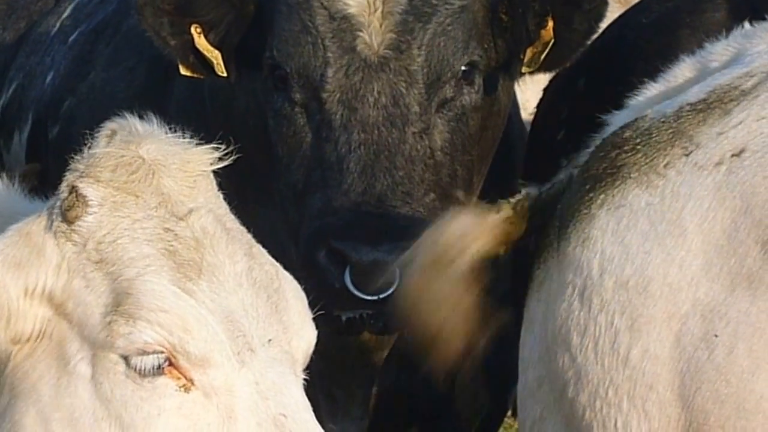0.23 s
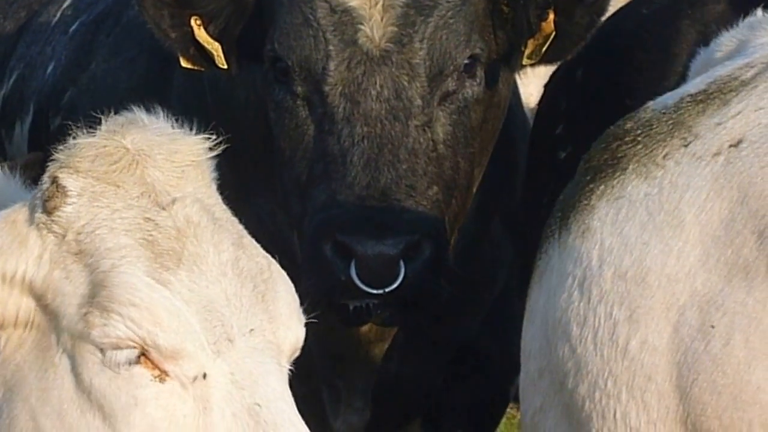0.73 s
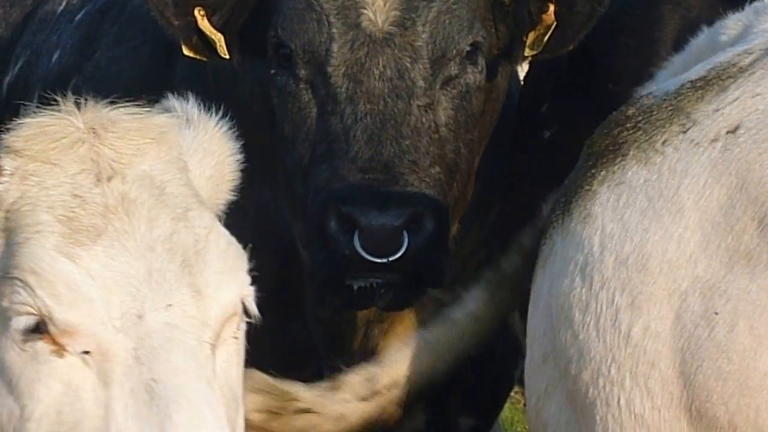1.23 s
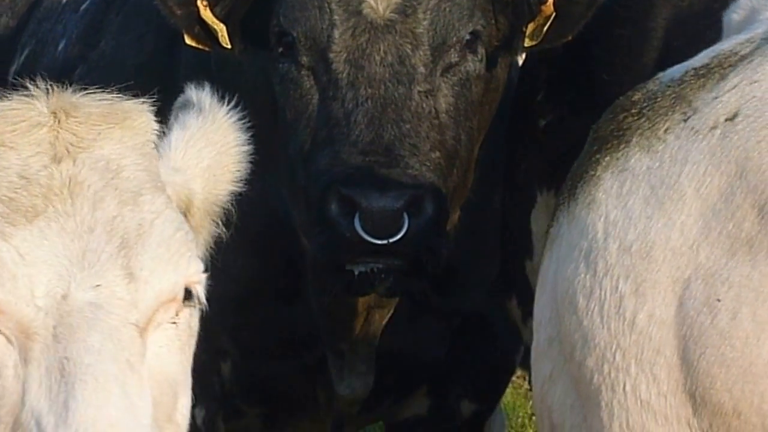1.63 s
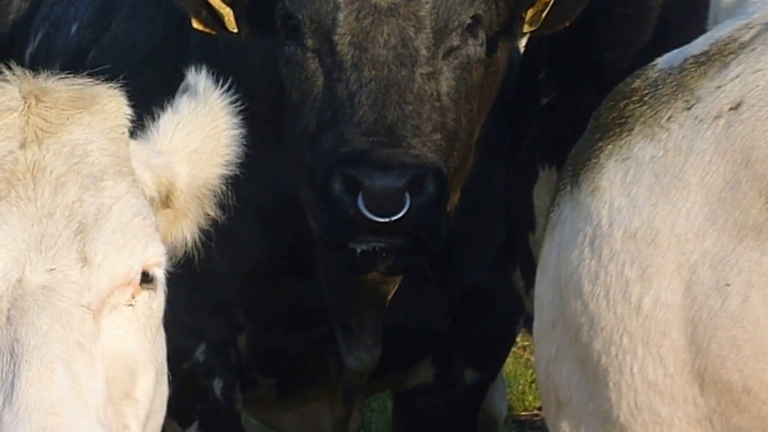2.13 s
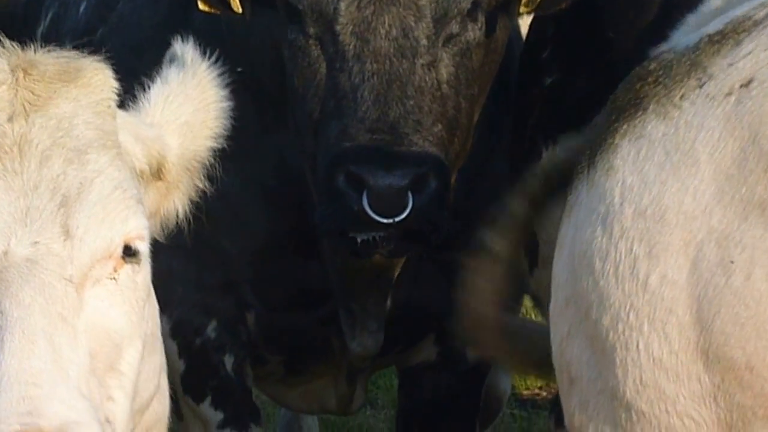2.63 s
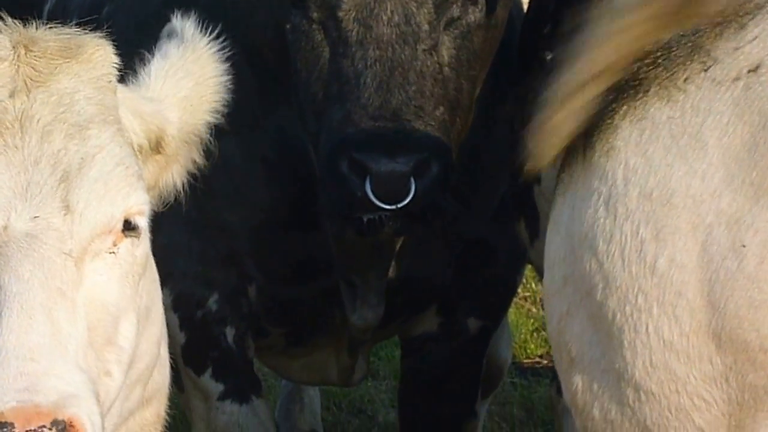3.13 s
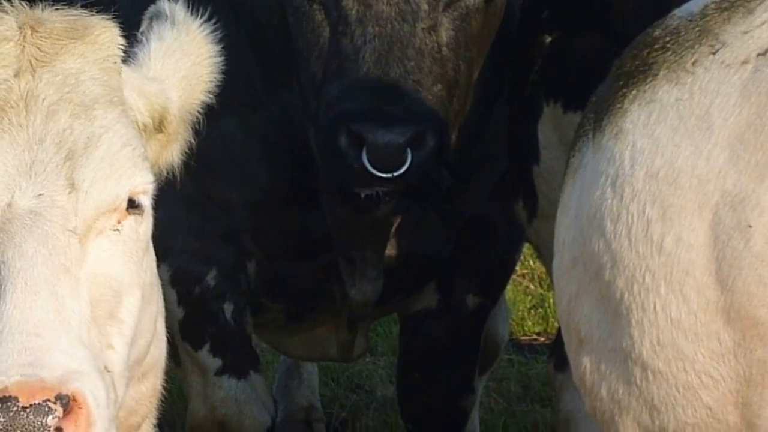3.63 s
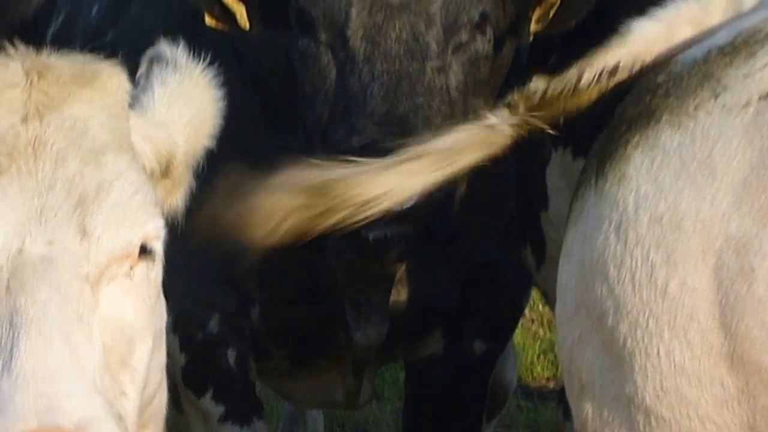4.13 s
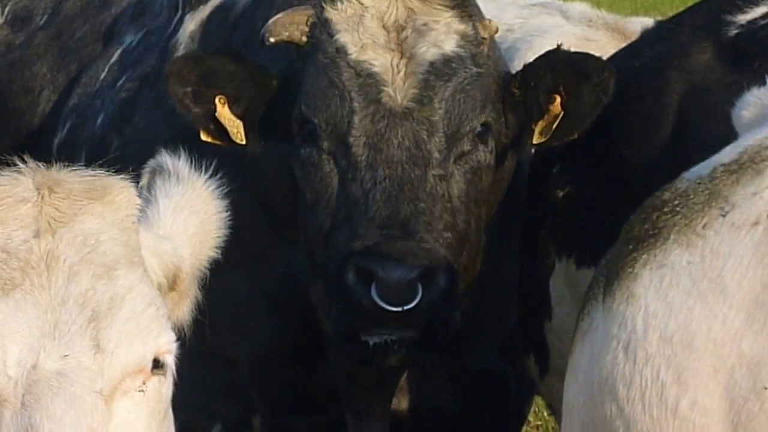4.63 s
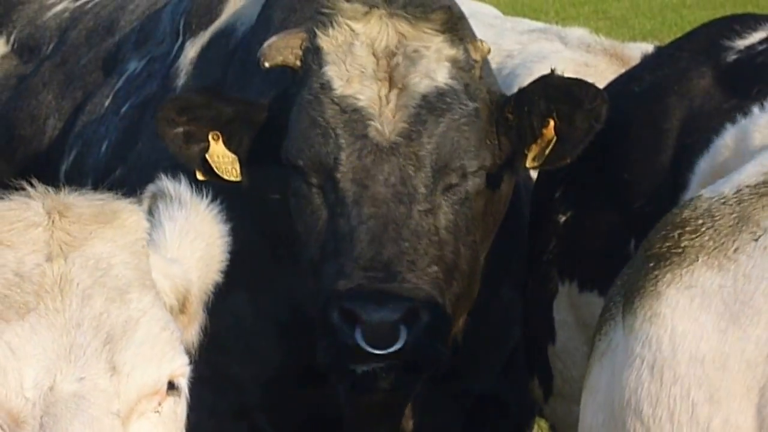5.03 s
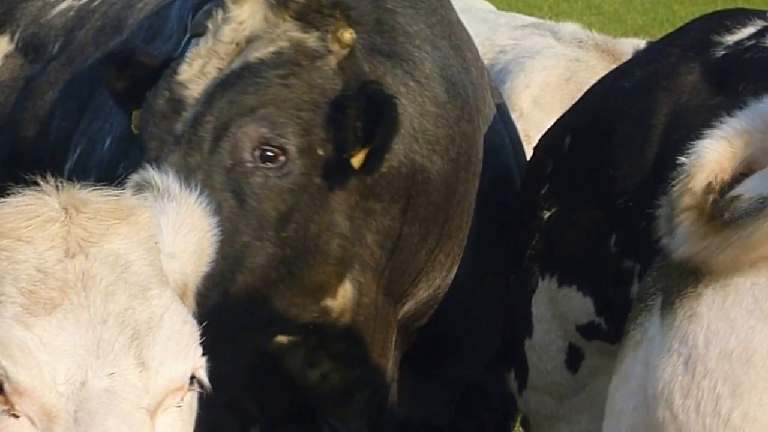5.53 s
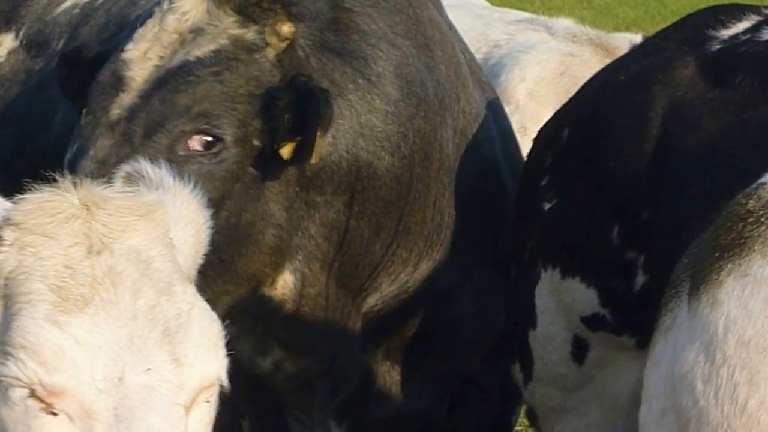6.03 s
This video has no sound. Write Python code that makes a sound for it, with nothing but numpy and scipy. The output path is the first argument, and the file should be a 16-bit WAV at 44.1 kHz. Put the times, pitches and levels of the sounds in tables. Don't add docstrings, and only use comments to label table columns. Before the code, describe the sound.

Wind bumps the microphone first, then a nearby bull lets out a deep, nasal, drawn-out moo that swells and ends in a breathy huff. After a pause with a strong wind thump and faint bird notes, a second, slightly higher and fuller bellow follows. Then only gusty low rumbling and popping grow, with a few distant chirps and a trill. Outdoors, dry, with faint distant hum and steady hiss.

```python
import sys
import numpy as np
from scipy import signal
from scipy.fft import rfft, irfft
from scipy.io import wavfile
from scipy.ndimage import uniform_filter1d

SR = 44100
rng = np.random.default_rng(int(sys.argv[2]) if len(sys.argv) > 2 else 0)


def log_audio(samples):
    frames = np.atleast_2d(samples).T
    limited = np.clip(frames, -1, 1)
    pcm = np.round(limited * 32767).astype(np.int16)
    wavfile.write(sys.argv[1], SR, pcm)


def undo_db(level):
    steps = np.asarray(level, float) / 20
    return 10 ** steps


N = 277381


def rms_one(x):
    return x / np.sqrt(np.mean(x ** 2) + 1e-20)


def span(rows, fade_s=0.002):
    s, *columns = np.transpose(rows)
    first, last = max(round(s[0] * SR), 0), min(round(s[-1] * SR), N)
    t = np.arange(first, last) / SR
    gate = np.clip(np.minimum(t - s[0], s[-1] - t) / fade_s, 0, 1)
    return slice(first, last), gate, [np.interp(t, s, c) for c in columns]


def drift(rate_hz, size=N):
    r = np.exp(-80 * np.pi * rate_hz / SR)
    noise = rng.standard_normal(size // 40 + 502)
    slow = signal.lfilter([1], [1, -2 * r, r * r], noise)[500:]
    return np.interp(np.arange(size) / 40, np.arange(len(slow)), rms_one(slow))


def colour(x, spectrum):
    hz, db = np.transpose(spectrum)
    bins_hz = np.maximum(np.fft.rfftfreq(len(x), 1 / SR), 1)
    gain = undo_db(np.interp(np.log(bins_hz), np.log(hz), db))
    return rms_one(irfft(rfft(x) * gain, len(x)))


def resonate(x, hz, width_hz):
    r = np.exp(-np.pi * width_hz / SR)
    poles = [1, -2 * r * np.cos(2 * np.pi * hz / SR), r * r]
    return signal.lfilter([(1 - r * r) / 2, 0, (r * r - 1) / 2], poles, x)


def bull(wobble=0.0022, flicker_db=0.67, airy_db=-13, skirt=1.67, count=58, bloom_s=0.1):
    # (time [s], pitch [Hz], effort [dB], mouth opening [0-1], chest tone [dB])
    calls = [
        [(.782, 87.4, -44, 0.2, -12), (.818, 94.2, -32, 0.18, -8), (.92, 98.74, -33.5, 0.01, -4.5),
         (1.34, 111.3, -25, 0.31, -6), (1.64, 115.5, -25.5, 0.8, -2), (1.96, 117, -25, 0.77, -7.5),
         (2.21, 113, -26, 0.63, -5), (2.342, 102.9, -26, 0.15, -24), (2.364, 90, -32, 0.7, -16)],
        [(3.3, 91.1, -36.5, 0.4, -13), (3.378, 97.4, -35, 0, -8), (3.512, 101.5, -36.5, 0.16, -2),
         (3.808, 109.2, -28.5, 0.64, -2.5), (4.27, 122.9, -23.5, 0.98, -3), (4.598, 120.4, -25.5, 0.86, 0),
         (4.702, 115.7, -24.5, 0.89, -7), (4.82, 101.9, -26.5, 0.5, -9), (4.862, 86, -50, 0.34, -10)],
    ]
    # (shut [Hz], open [Hz], width [Hz], shut [dB], open [dB])
    throat = np.array([(202, 206.8, 79.3, 2.5, 7.5), (434.5, 363.7, 91, -14.5, -10.5),
                       (467, 512, 103, -22, -22), (564, 636, 110, -34, -25), (781, 723, 122, -22, -22),
                       (860, 885, 190, -30.5, -25), (1078, 1050, 28, -40, -20), (1390, 1400, 240, -26, -54),
                       (1296, 1289, 83, -41, -16.5), (1740, 1655, 60, -32, -28), (1890, 1855, 49, -43, -33),
                       (2037, 2030, 69, -41.5, -33.5), (2600, 4500, 580, -60.5, -56),
                       (3400, 3405, 320, -50.5, -45), (3950, 3950, 370, -48.5, -52.5),
                       (4750, 4600, 300, -52.5, -49), (5500, 5350, 370, -56.5, -46),
                       (6280, 6250, 140, -61, -46.5)])
    # (time [s], half length [s], low ring [dB], high ring [dB])
    nose = [
        (0.985, 0.15, 16.5, 13),
        (1.234, 0.11, 24.5, 4),
        (1.8, 0.29, 3.5, 10.5),
        (3.43, 0.15, 25.5, 3.5),
        (3.699, 0.15, 23, 10.5),
        (4.351, 0.37, 17, 11),
    ]
    # (low, high) [dB]
    nose_shut_db = [-7.5, -4.5]

    out = np.zeros(N)
    nose_s, nose_half_s, *nose_db = np.transpose(nose)
    for call in calls:
        at, gate, (pitch, effort_db, mouth, chest_db) = span(call, fade_s=0.0023)
        size = len(gate)
        mouth = np.clip(mouth, 0, 1)[::64, None]
        fine, coarse = np.arange(size) / 64, np.arange(len(mouth))
        since_s = coarse[:, None] * 64 / SR
        centre = throat[:, 0] + mouth * (throat[:, 1] - throat[:, 0])
        height = undo_db(throat[:, 3] + mouth * (throat[:, 4] - throat[:, 3]))
        height[:, 1:] *= np.clip(since_s / bloom_s, 0, 1) ** 2
        swell = np.exp(-((call[0][0] + since_s - nose_s) / nose_half_s) ** 2)
        for j, ring_db, shut_db in zip([2, 4], nose_db, nose_shut_db):
            height[:, j] *= undo_db(shut_db + swell @ ring_db)

        phase = 2 * np.pi * np.cumsum(pitch * (1 + wobble * drift(23, size))) / SR
        voice = undo_db(chest_db) * np.sin(phase + 0.47)
        for k in range(2, count + 1):
            overtone_hz = k * pitch[::64]
            off = (overtone_hz[:, None] - centre) / (throat[:, 2] / 2)
            weight = np.sum(height / (1 + off ** 2) ** skirt, axis=1)
            weight *= 1 - 0.51 * (1 - mouth[:, 0]) / (1 + ((overtone_hz - 295) / 50) ** 2)
            flicker = undo_db(min(flicker_db * np.sqrt(k - 1), 1.7) * drift(17, size))
            blur = (0.016 * k + 0.00001 * k ** 3) * drift(30, size)
            voice += np.interp(fine, coarse, weight) * flicker * np.sin(k * phase + 0.9 * k * k + blur)

        rush = rng.standard_normal(size) * (1 + 0.5 * np.sin(phase))
        for j in range(5, len(throat)):
            hz, width_hz = throat[j, 1:3]
            breath = rms_one(resonate(resonate(rush, hz, width_hz), hz, 2.1 * width_hz))
            breath = breath * undo_db(1.3 * drift(13, size))
            breath_db = airy_db + 4.9 * np.log2(hz / 700)
            voice += undo_db(breath_db) * np.interp(fine, coarse, height[:, j]) * breath
        out[at] += np.sqrt(2) * undo_db(effort_db) * gate * voice
    return out


def huffs():
    # (time [s], length [s], level [dB])
    puffs = [
        (2.361, 0.072, -40.5),
        (2.414, 0.15, -51.5),
        (4.852, 0.044, -35.5),
        (4.876, 0.035, -41),
    ]
    out = np.zeros(N)
    for s, length_s, db in puffs:
        first, size = round(s * SR), round(length_s * SR)
        air = rng.standard_normal(size)
        puff = resonate(air, 610, 88) - resonate(air, 880, 170)
        puff += 0.23 * resonate(air, 1650, 200) - 0.16 * resonate(air, 1770, 200)
        out[first:first + size] += undo_db(db) * rms_one(puff) * np.hanning(size)
    return out


def gusts(edge_s=0.039, skirt_db=19, calm_db=-71):
    # (middle [s], level [dB], hold [s])
    blows = [(0.095, -24.5, 0.07), (0.249, -25, 0.063), (0.433, -29, 0.073), (5.117, -28.5, 0.022),
             (0.611, -37, 0.02), (1.22, -35, 0.3), (1.517, -35.5, 0.016), (1.653, -28.5, 0.0071),
             (1.801, -28.5, .02), (2.002, -26, 0.12), (2.476, -29.5, 0.028), (2.846, -38.5, 0.0051),
             (3.027, -48, 0.0092), (3.172, -27.5, 0.015), (3.286, -29, 0.011), (2.587, -41, .03),
             (2.868, -39.5, .01), (5.543, -31.5, .03), (5.73, -32.5, .03), (0.333, -32, .03),
             (3.509, -30, 0.034), (3.862, -29, 0.16), (4.152, -26.5, 0.19), (4.35, -23, 0.049),
             (4.53, -25.5, 0.032), (4.796, -25.5, 0.056), (5.054, -30, 0.02), (5.256, -23, 0.033),
             (5.462, -32, 0.26), (5.623, -24, 0.052), (5.75, -26.5, 0.019), (6.016, -20, 0.24),
             (6.263, -29, 0.02)]
    t, power = np.arange(0, N, 64) / SR, undo_db(2 * calm_db)
    for s, db, hold_s in blows:
        away = np.maximum(np.abs(t - s) - hold_s / 2, 0) / edge_s
        power = power + undo_db(2 * (db - skirt_db * np.log10(1 + away ** 2)))
    return np.interp(np.arange(N) / SR, t, 10 * np.log10(power))


def wind(eddies_per_s=220, spread_db=2.5, lumpy_db=4.0, rumble_db=-49.5):
    # (frequency [Hz], level [dB per Hz])
    lump_spectrum = [(18, -40.5), (30, -10), (91, 9.5), (227, 0.5), (295, -3.5), (414, -11), (581, -21),
                     (841, -48.5), (1200, -59), (1560, -68), (2640, -120)]
    gust_db = gusts()
    sizes = undo_db(spread_db * np.minimum(rng.exponential(1, N), 3)) * rng.choice([-1, 1], N)
    lumps = colour(sizes * (rng.random(N) < eddies_per_s / SR), lump_spectrum)
    lumps = rms_one(lumps + 0.46 * resonate(lumps, 190, 90))
    lumps = rms_one(lumps / uniform_filter1d(lumps ** 2, size=2600) ** 0.37)
    dull = signal.sosfilt(signal.butter(2, 190, fs=SR, output="sos"), lumps)
    bright = np.clip((gust_db + 40.5) / 16, 0, 1.7)
    strength_db = gust_db - 2.5 + lumpy_db * np.tanh(0.36 * drift(5.5) + 0.5 * drift(30))
    edges = np.clip(np.minimum(N - np.arange(N), np.arange(N)) / 400, 0, 1)
    buffet = undo_db(strength_db) * (dull + bright * (lumps - dull)) * edges

    low_band = signal.butter(2, [35, 95], "band", fs=SR, output="sos")
    rumble = rms_one(signal.sosfilt(low_band, rng.standard_normal(N)))
    return buffet + undo_db(rumble_db + 3.1 * drift(2.1)) * rumble


def eddies(flick_db=2.5, snap_swings=0.29, flick_swings=0.33, flick_lag_s=0.0014):
    # (time [s], peak [dB], pitch [Hz])
    snap_rows = [(0.016, -24, 174), (0.049, -17.5, 253.0), (0.149, -5.5, 205), (0.218, -15.5, 302.0),
                 (0.27, -13, 248), (0.423, -19, 214), (0.435, -17.5, 250), (1.234, -17, 170),
                 (1.654, -17.5, 245), (1.955, -14.5, 253.6), (2.007, -15, 253.0), (2.063, -14, 211.0),
                 (2.498, -20.5, 240), (3.031, -31, 174), (3.2, -15.5, 240), (3.27, -9, 196),
                 (3.857, -16, 176.0), (4.102, -12.5, 302.0), (4.111, -18.0, 211.0), (4.183, -18, 250),
                 (4.26, -11, 253.0), (4.277, -14.5, 357.3), (4.391, -13, 253.0), (4.551, -15.5, 210),
                 (4.761, -23, 176.0), (4.976, -8.5, 234), (5.022, -12, 175), (5.048, -19, 300),
                 (5.066, -20, 176.0), (5.212, -14, 148), (5.243, -9.5, 216), (5.271, -10.5, 262),
                 (5.335, -12.0, 234), (5.525, -19.5, 207), (5.613, -12, 305), (5.636, -16, 214),
                 (5.661, -9.5, 215), (5.672, -18.5, 254), (5.76, -14, 253.0), (5.874, -15, 211.0),
                 (5.888, -16, 302.0), (5.9, -21, 176.0), (5.953, -9.5, 215), (5.964, -9.5, 305),
                 (5.995, -8, 305), (6.044, -9.5, 257), (6.065, -10, 211.0), (6.079, -9, 211.0),
                 (6.088, -14.5, 256), (6.112, -11.5, 250), (6.125, -9.0, 300), (6.161, -13, 213)]
    # (time [s], peak [dB], pitch [Hz], roll [ms])
    swirl_rows = [(0.067, -12, 151, 4.3), (0.102, -18.0, 147.0, 5.8), (0.123, -20, 178, 4.3),
                  (0.136, -19.5, 249, 2.2), (0.193, -8.5, 149, 1.7), (0.208, -22.0, 122, 10),
                  (0.29, -17, 210, 3.6), (0.381, -22.5, 180, 3.2), (0.464, -23, 148, 4.7),
                  (1.52, -21.0, 147.0, 2.2), (1.702, -20.5, 176.0, 3.2), (1.813, -21.5, 148, 7.0),
                  (1.966, -14, 124.5, 2.3), (2.187, -25.5, 146, 2.2), (2.452, -25, 124.1, 2.7),
                  (2.474, -21, 86.0, 3.9), (2.826, -20.5, 121, 2.5), (3.18, -12.5, 178, 2),
                  (3.501, -28, 145, 7.0), (3.595, -23, 123.0, 3.1), (3.971, -22, 210, 2.6),
                  (4.147, -19, 147.0, 2.2), (4.209, -11, 147.0, 2.2), (4.32, -16, 211.0, 2.2),
                  (4.331, -10, 177, 2.1), (4.351, -11.5, 177, 2.4), (4.489, -18.5, 125, 3.8),
                  (4.756, -14.5, 144.9, 3.2), (5.204, -21.5, 175, 3.5), (5.228, -19.5, 102, 9.5),
                  (5.261, -15.5, 173, 5.1), (5.286, -19, 253.0, 5.1), (5.306, -21, 174, 7.6),
                  (5.397, -22.5, 210, 2.8), (5.432, -21, 122, 2.5), (5.449, -19, 147.0, 3.2),
                  (5.56, -23.5, 123.0, 10), (5.6, -15, 145, 7.0), (5.652, -21, 176.0, 2.4),
                  (5.771, -13.5, 245, 2.3), (5.833, -16.5, 146, 2.3), (5.853, -14, 147.0, 2.8),
                  (5.911, -18, 176.0, 1.9), (5.936, -11.5, 146, 2.6), (5.974, -10, 258, 2.8),
                  (6.021, -13.5, 257, 2.4), (6.031, -17.5, 356, 2), (6.14, -17, 146, 8.4),
                  (6.244, -18, 146, 2.2), (6.271, -14, 202, 1.96)]
    # (time [s], peak [dB], pitch [Hz])
    flick_rows = [(0.215, -32, 428), (0.265, -37, 401), (0.377, -35, 452), (0.449, -35, 479),
                  (3.197, -35, 401), (4.099, -24, 401), (4.275, -29, 503), (5.12, -33.5, 401),
                  (5.237, -27.5, 401), (5.276, -28, 401), (5.61, -30, 401), (5.657, -24, 425),
                  (5.766, -29.5, 439), (5.885, -29, 474), (5.928, -26, 401), (5.957, -22, 401),
                  (5.97, -26, 560), (5.993, -26, 431), (6.03, -22, 401), (6.042, -26, 447),
                  (6.075, -25, 401), (6.124, -29, 401), (6.145, -24, 401)]

    out, t = np.zeros(N + 4000), (np.arange(4000) - 2000) / SR
    # (time [s], peak [dB], pitch [Hz], width [ms], lean [rad])
    rows = [(s, db, hz, 1000 * snap_swings / hz, 1.0) for s, db, hz in snap_rows]
    rows += [(s, db, hz, ms, np.pi) for s, db, hz, ms in swirl_rows]
    rows += [(s + flick_lag_s, db + flick_db, 1.14 * hz, 1000 * flick_swings / (1.3 * hz), np.pi)
             for s, db, hz in flick_rows]
    for (s, db, hz, ms, lean), chance in zip(rows, rng.uniform(-1.05, 1, len(rows))):
        shape = -np.cos(2 * np.pi * hz * t + lean * chance) / np.cosh(1000 * t / ms)
        recoil = 1 / np.cosh(250 * t / ms)
        shape -= shape.mean() / np.mean(recoil) * recoil
        first = round(s * SR)
        out[first:first + 4000] += undo_db(db) * shape / np.max(np.abs(shape))
    return out[2000:N + 2000]


def small_pops(count=190, over_gust_db=5, spread_db=6.5, jump_ms=0.81, slows_per_db=0.13):
    place, size, speed = rng.random((count, 3)).T
    s = (np.arange(count) + place) / count * (N - 1) / SR
    gust_db = gusts()[(s * SR).astype(int)]
    jumps_ms = jump_ms * np.exp(slows_per_db * (-19.5 - gust_db) + 0.5 * (speed - 0.5))
    peaks_db = gust_db + over_gust_db + spread_db * np.log(size + 0.02)
    return list(zip(s, peaks_db, np.clip(jumps_ms, 0.3, 3)))


def pops(boost_db=-1.5, damping=2.46):
    # (time [s], peak [dB], jump [ms])
    slams = [
        (2.2028, -3, .62),
        (5.0364, -6.5, .44),
    ]
    # (time [s], peak [dB])
    knocks = [
        (2.2031, -30),
        (5.0365, -29),
        (5.9710, -31),
    ]

    out, t = np.zeros(N + 2000), (np.arange(2000) - 1000) / SR
    bursts = [(*row, True) for row in slams] + [(*row, False) for row in small_pops()]
    for s, db, jump_ms, slam in bursts:
        hz = 135 + 55 / jump_ms
        jump_s = jump_ms / 1000
        decay = np.exp(-damping * hz * np.hypot(t, jump_s))
        shape = np.tanh(t / jump_s) * np.cos(np.pi * hz * t) * decay
        if slam:
            shape *= 1 + np.tanh(t / 0.0012) / 2.4
        sign = 1 if slam else rng.choice([-1, 1])
        first = round(s * SR)
        out[first:first + 2000] += sign * undo_db(db + boost_db) * shape / np.max(np.abs(shape))
    for s, db in knocks:
        first = round(s * SR)
        out[first:first + 2000] += undo_db(db) * np.tanh(t / 0.00009) * np.exp(-np.abs(t) / 0.0007)
    return out[1000:N + 1000]


def birds():
    # (share of length, pitch ratio, level [dB])
    low_form = [(0, .92, -14), (.12, .985, -4), (.25, 0.99, -1.5), (.6, .993, -2), (.93, .975, -4),
                (1, 0.9, -12)]
    high_form = [(0, .97, -3), (.35, 1.0, 1.5), (.65, 1.005, 5), (1, .97, -6)]
    # (time [s], length [s], pitch [Hz], level [dB])
    low_rows = [
        (0.796, 0.1, 2720, -61.5),
        (2.785, 0.14, 2677, -51.5),
        (3.269, 0.11, 2645, -52),
        (3.738, 0.074, 2650, -54.5),
    ]
    high_rows = [
        (0.429, 0.033, 3480, -61.5),
        (2.688, 0.034, 3850, -64.5),
        (3.159, 0.034, 3830, -65),
    ]
    # (time [s], pitch [Hz], level [dB])
    arch = [(0.0, 2840, -9), (.007, 3180, -5), (0.022, 3470, -3.5), (0.034, 3400, -3), (.047, 2762, -4)]
    # (time [s], level [dB])
    arch_calls = [
        (2.734, -51),
        (3.209, -50.5),
        (3.678, -52.5),
    ]
    # (time [s], pitch [Hz], level [dB])
    slurs = [
        [(5.235, 2690, -71), (5.249, 3140, -59), (5.275, 2900, -51), (5.309, 2750, -54), (5.36, 2600, -79.5)],
        [(5.545, 3610, -71.5), (5.561, 3400, -51), (5.601, 2374, -59), (5.651, 2960, -57.5), (5.687, 2840, -55),
         (5.705, 2874, -71)],
        [(5.79, 3640, -81), (5.798, 3810, -57), (5.816, 3610, -56.5), (5.88, 3820, -63.5)],
    ]
    # (time [s], pitch [Hz], level [dB])
    curls = [
        [(.965, 3000, -68), (.99, 3350, -65), (1.005, 3420, -59), (1.022, 3480, -66)],
        [(1.595, 3455, -65), (1.62, 3630, -68), (1.65, 3980, -65), (1.69, 4060, -75), (1.85, 4034, -79)],
        [(1.89, 3300, -68), (1.912, 3068, -61), (1.94, 2977, -72)],
        [(2.04, 4060, -68), (2.058, 3550, -68), (2.08, 3390, -61.5), (2.11, 3520, -67)],
    ]
    # (time [s], length [s], from [Hz], to [Hz], level [dB])
    chirp_rows = [(0.21, .06, 3930, 3980, -70), (.35, 0.025, 3570, 3500, -65),
                  (.49, 0.063, 2480, 2580, -70.5), (0.704, 0.026, 5160, 4240, -68),
                  (0.839, 0.082, 4900, 4750, -74), (1.075, .016, 4150, 3980, -60),
                  (1.096, 0.013, 3950, 3820, -64), (1.112, 0.015, 3700, 3580, -63),
                  (1.065, 0.098, 3400, 3460, -68.5), (1.38, 0.012, 3900, 4020, -60),
                  (1.435, .03, 4260, 4360, -60.5), (1.418, 0.026, 3680, 3400, -62),
                  (2.014, 0.026, 4102, 3910, -66.5), (2.228, 0.021, 4008, 5350, -66),
                  (2.262, 0.014, 5350, 4450, -65), (2.372, .012, 4870, 4650, -66),
                  (2.307, 0.02, 4000, 3520, -60.5), (2.338, 0.019, 4130, 5400, -61),
                  (3.63, 0.046, 3790, 3920, -66), (5.99, 0.07, 5300, 5500, -69)]
    # (time [s], pitch [Hz], level [dB])
    second_voice = [(5.62, 2750, -71), (5.65, 2770, -58), (5.695, 2800, -61), (5.705, 2790, -85)]
    # (time [s], pitch [Hz], level [dB])
    trill = [(4.929, 2700, -58.5), (4.942, 2960, -59), (4.95, 2930, -80), (4.962, 2990, -54),
             (5.03, 3010, -57), (5.064, 2880, -59), (5.095, 2780, -68)]
    # (delay [s], level [dB])
    hedges = [(.023, -16.5), (0.042, -17), (.067, -19), (.096, -20.5)]

    out = np.zeros(N)
    repeats = [np.array(arch) + [s, 0, db] for s, db in arch_calls]
    chirps = [[(s, from_hz, db), (s + length_s, to_hz, db)] for s, length_s, from_hz, to_hz, db in chirp_rows]
    held = [np.array(form) * [length_s, hz, 1] + [s, 0, db]
            for form, rows in [(low_form, low_rows), (high_form, high_rows)]
            for s, length_s, hz, db in rows]
    for note in held + slurs + curls + repeats + chirps + [second_voice, trill]:
        at, gate, (hz, db) = span(note, fade_s=0.0016)
        if note is trill:
            beat = np.cos(2 * np.pi * 39.5 * (np.arange(len(hz)) / SR - 0.0385))
            hz = hz + 150 * beat
            gate = gate * (1 - 0.85 * beat) ** 0.7
        hz = uniform_filter1d(hz, size=200)
        out[at] += np.sqrt(2) * undo_db(db) * gate * np.sin(2 * np.pi * np.cumsum(hz) / SR)
    return out + sum(undo_db(db) * np.roll(out, round(s * SR)) for s, db in hedges)


def field(hiss_db=-58.5):
    # (time [s], level [dB])
    hum_swell = [(0, -53), (.7, -48.5), (1.501, -45.5), (2.4, -46), (2.9, -46), (3.4, -45), (4.9, -46),
                 (5.6, -49.5), (6.29, -47.5)]
    # (frequency [Hz], level [dB per Hz])
    hum_spectrum = [(35, -26), (60, 7.5), (132, -1.5), (351, -14), (472, -9), (584, -10.5), (644, -8.5),
                    (986, -9.5), (1810, -24.5), (3000, -32.5), (3900, -49.5), (6600, -120)]
    # (frequency [Hz], level [dB per Hz])
    hiss_spectrum = [(880, -21.5), (1500, -5.5), (2270, -14), (6430, -16.5), (7820, -22), (8790, -30.5),
                     (9730, -37.5), (12600, -76.5), (21400, -120)]
    s, db = np.transpose(hum_swell)
    hum_db = np.interp(np.arange(N) / SR, s, db) + 4.0
    hum = undo_db(hum_db) * colour(rng.standard_normal(N), hum_spectrum)
    return hum + undo_db(hiss_db) * colour(rng.standard_normal(N), hiss_spectrum)


def scene():
    return (bull() + huffs() + wind() + eddies() + pops() + birds() + field())[None]


def low_pass(x):
    return signal.sosfilt(signal.butter(12, 9880, fs=SR, output="sos"), x)


def record(dry):
    x = 0.8 * np.tanh(dry / 0.8)
    x = signal.sosfilt(signal.butter(12, 9300, fs=SR, output="sos"), x)
    offset, noise_db = 0.0238, -95.5
    x = x + offset + undo_db(noise_db) * rng.standard_normal(x.shape)
    return low_pass(x)


dry = scene()
out = record(dry)
log_audio(out)
```